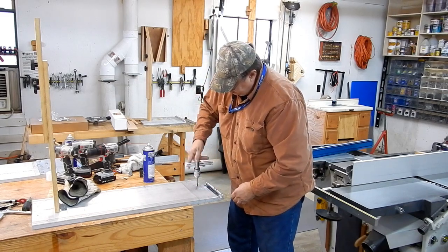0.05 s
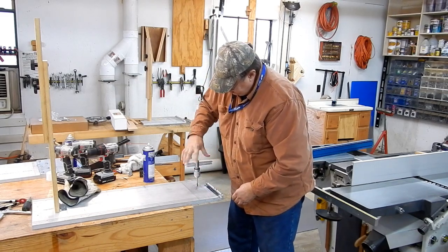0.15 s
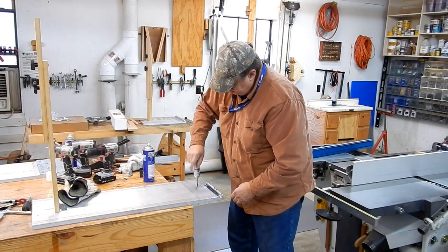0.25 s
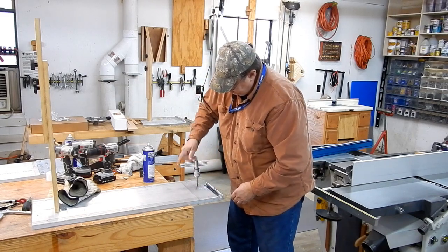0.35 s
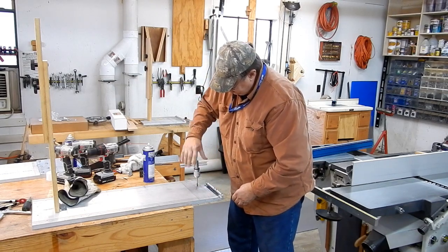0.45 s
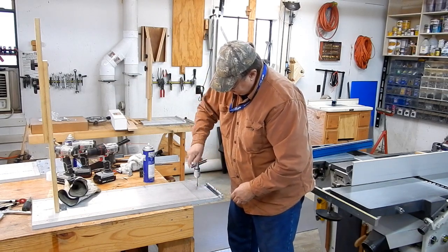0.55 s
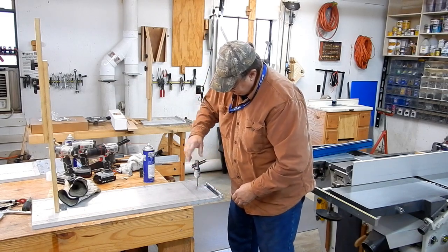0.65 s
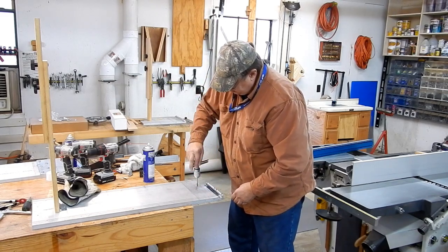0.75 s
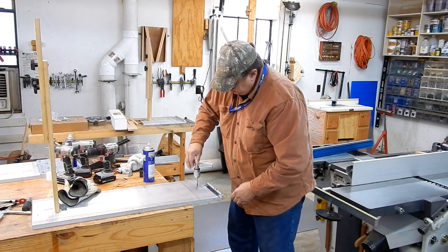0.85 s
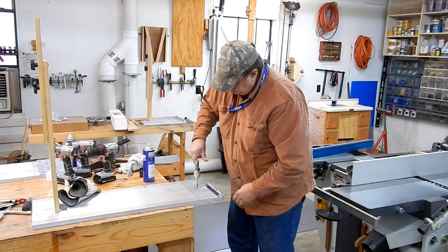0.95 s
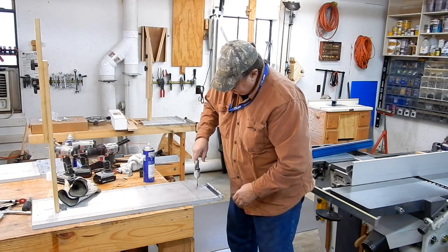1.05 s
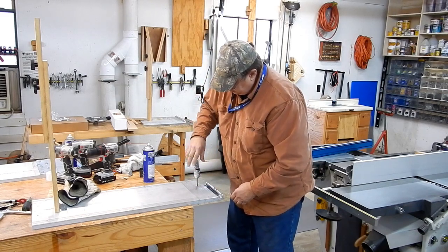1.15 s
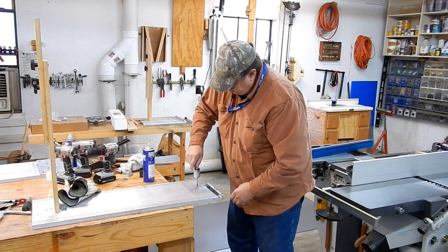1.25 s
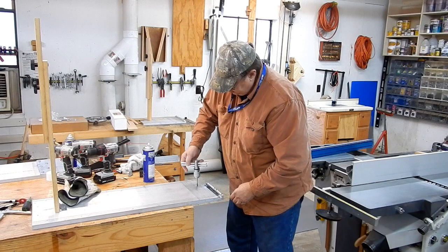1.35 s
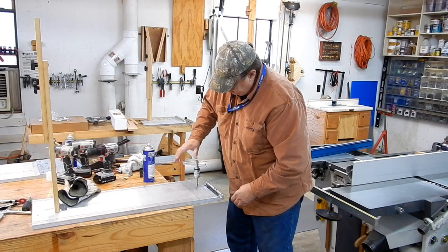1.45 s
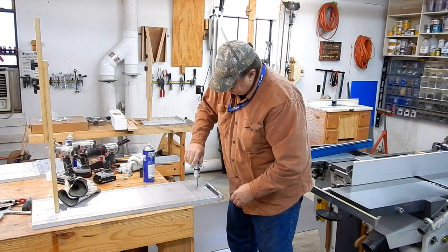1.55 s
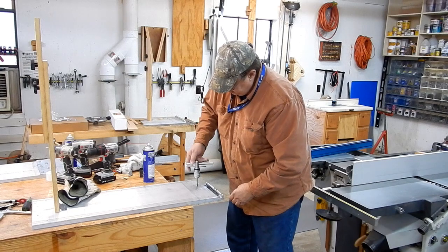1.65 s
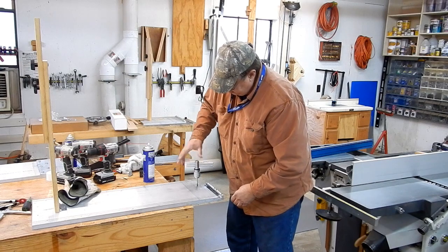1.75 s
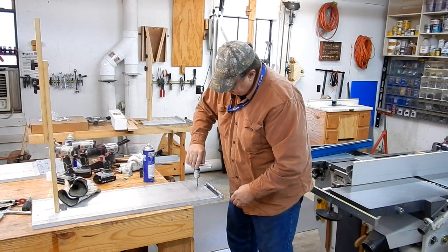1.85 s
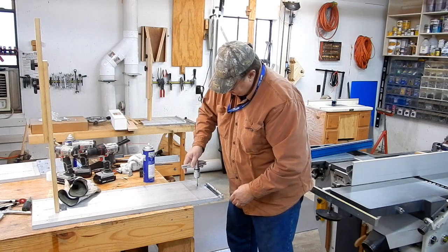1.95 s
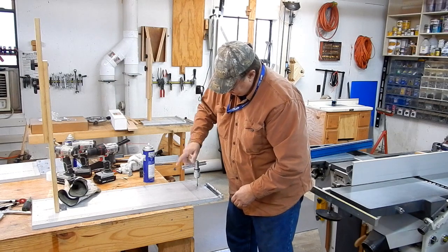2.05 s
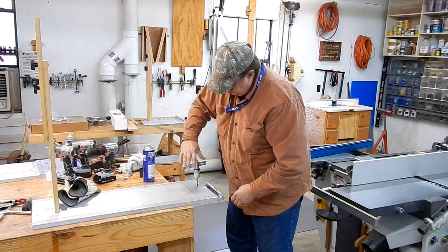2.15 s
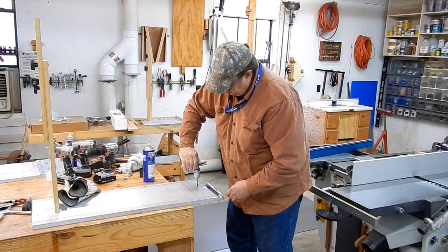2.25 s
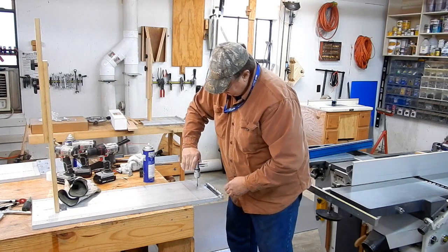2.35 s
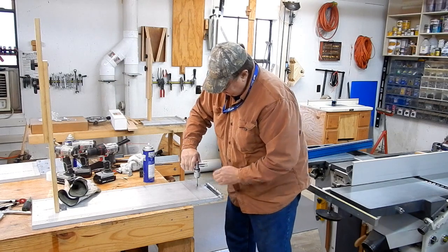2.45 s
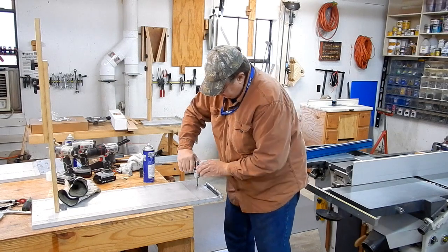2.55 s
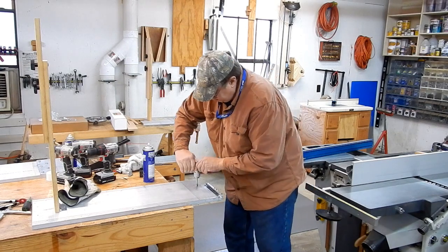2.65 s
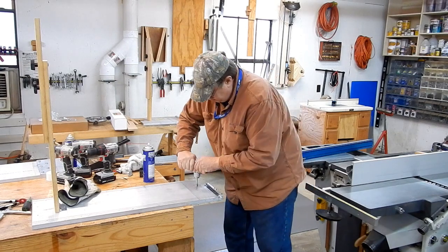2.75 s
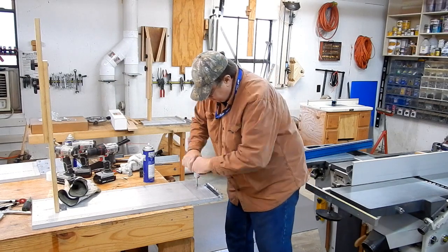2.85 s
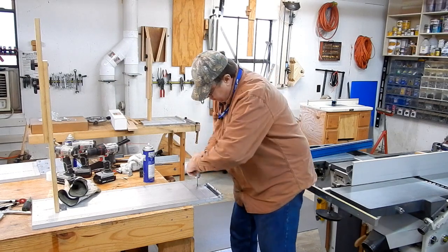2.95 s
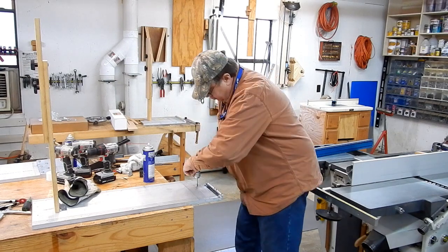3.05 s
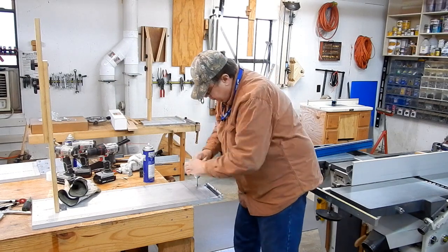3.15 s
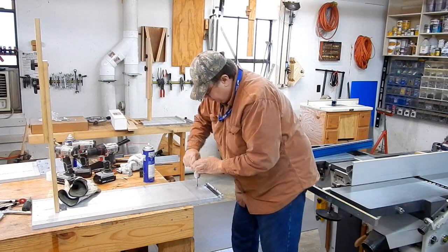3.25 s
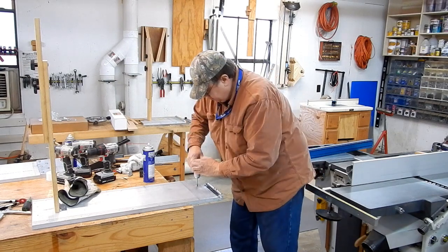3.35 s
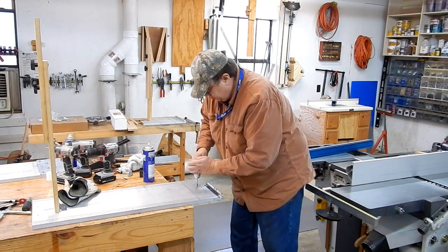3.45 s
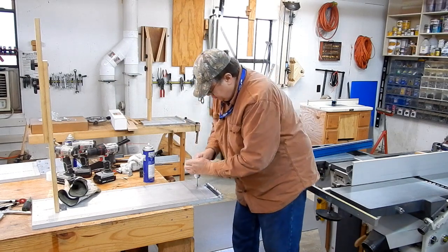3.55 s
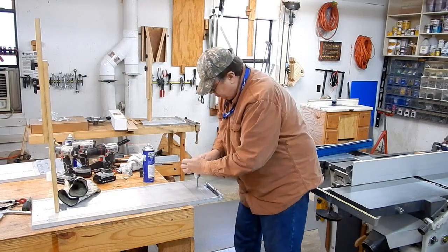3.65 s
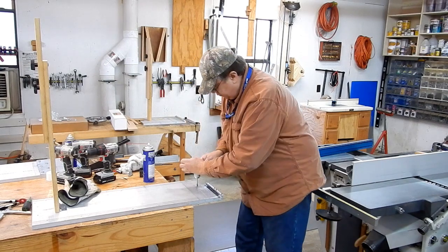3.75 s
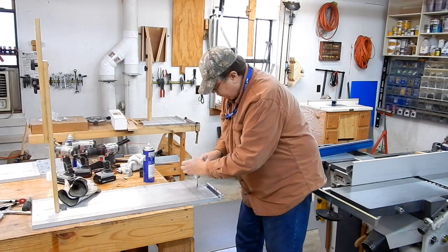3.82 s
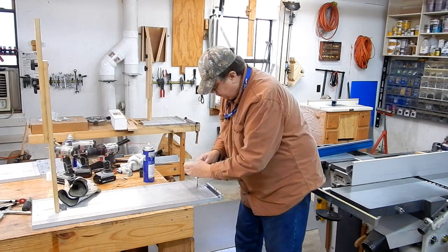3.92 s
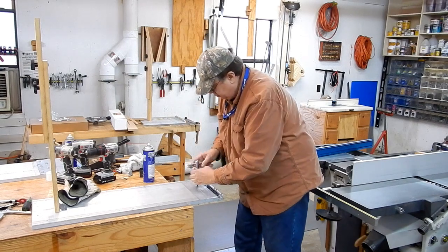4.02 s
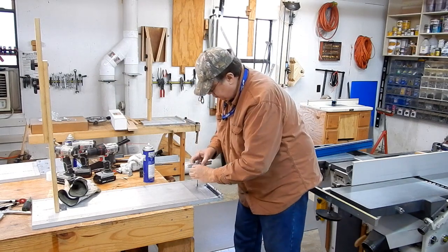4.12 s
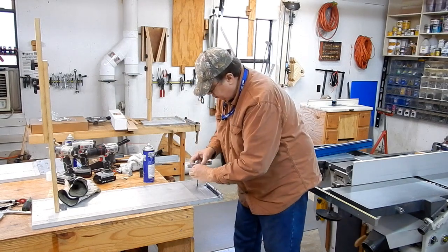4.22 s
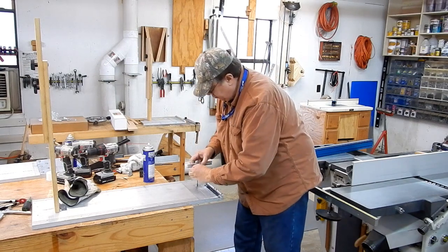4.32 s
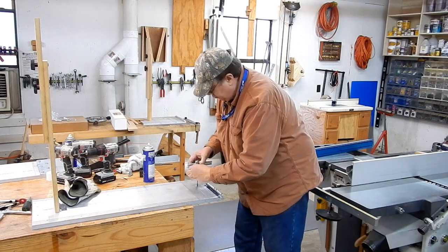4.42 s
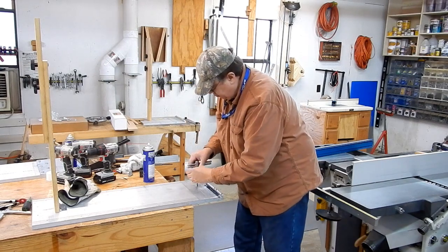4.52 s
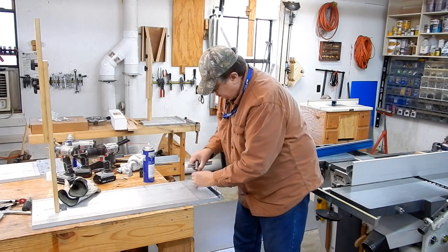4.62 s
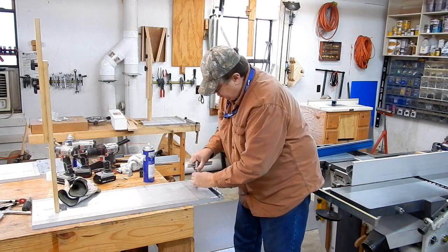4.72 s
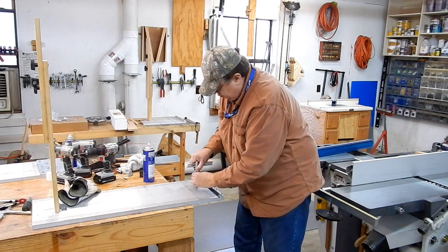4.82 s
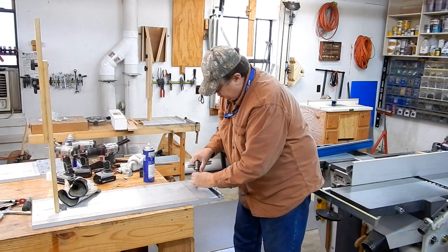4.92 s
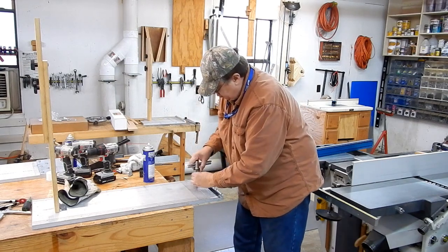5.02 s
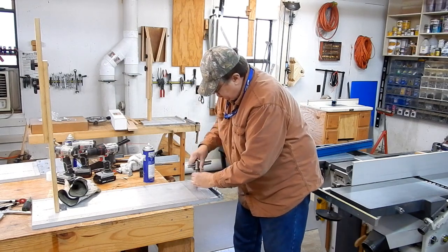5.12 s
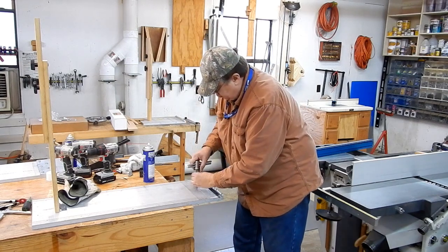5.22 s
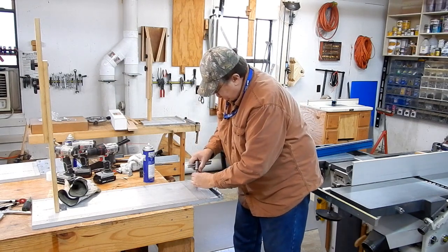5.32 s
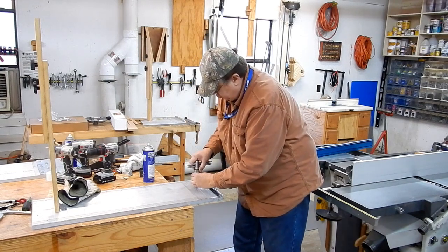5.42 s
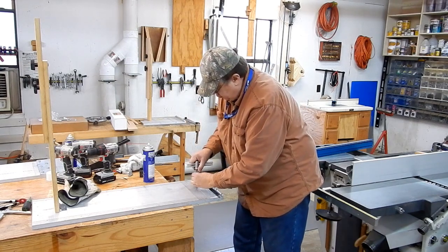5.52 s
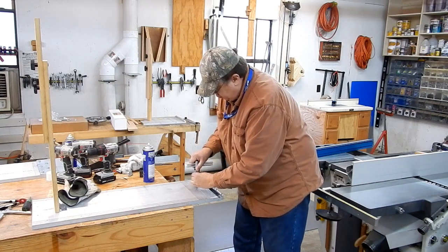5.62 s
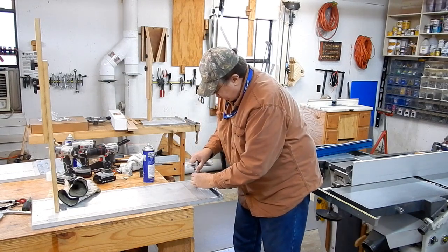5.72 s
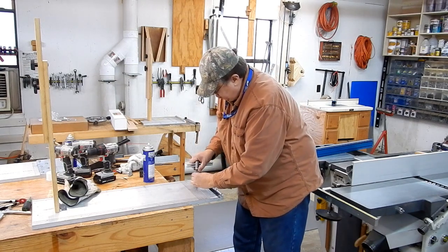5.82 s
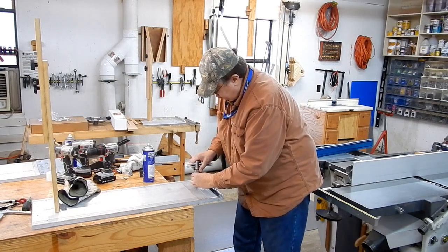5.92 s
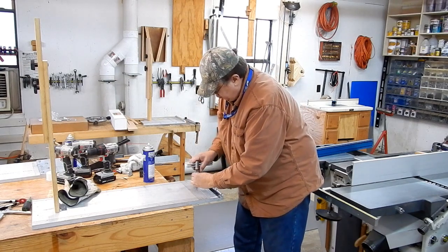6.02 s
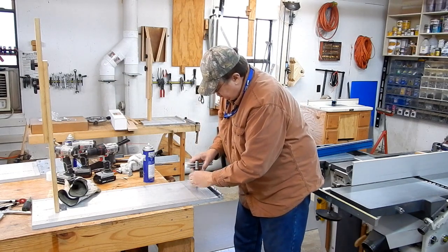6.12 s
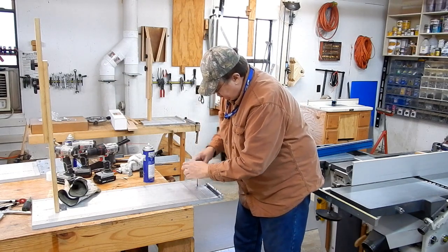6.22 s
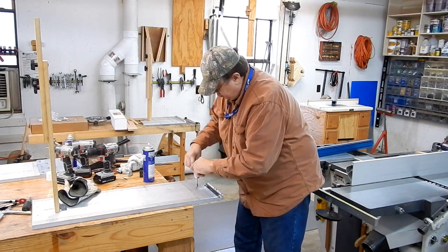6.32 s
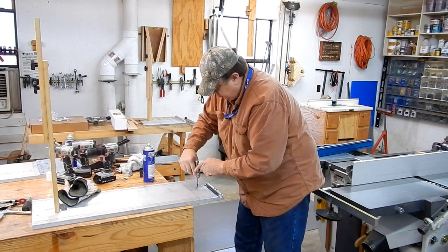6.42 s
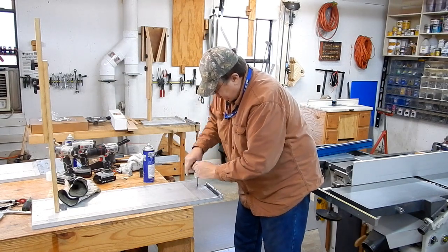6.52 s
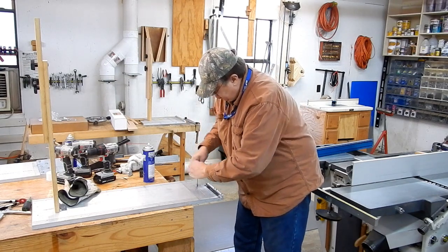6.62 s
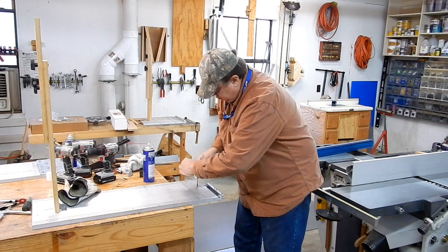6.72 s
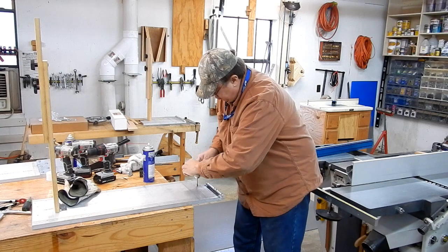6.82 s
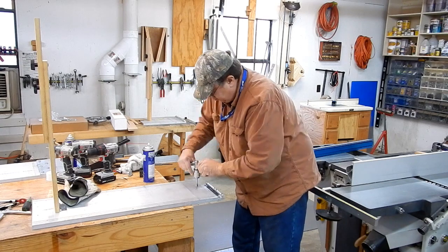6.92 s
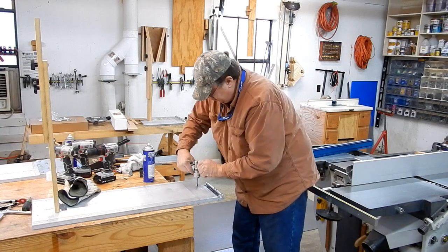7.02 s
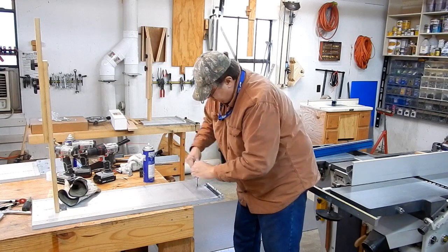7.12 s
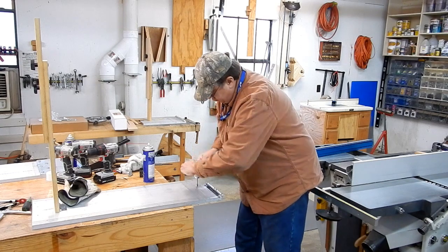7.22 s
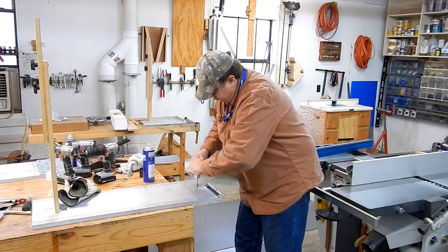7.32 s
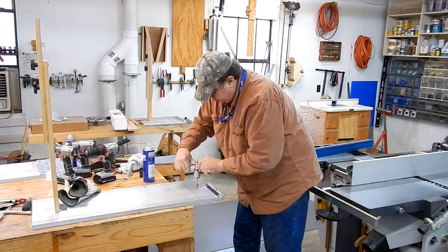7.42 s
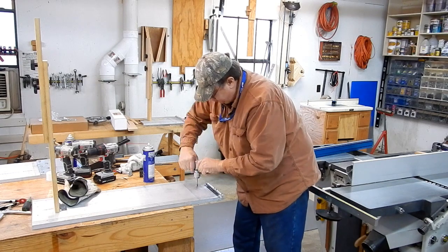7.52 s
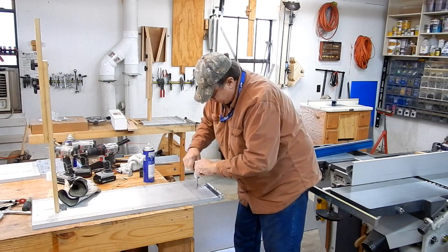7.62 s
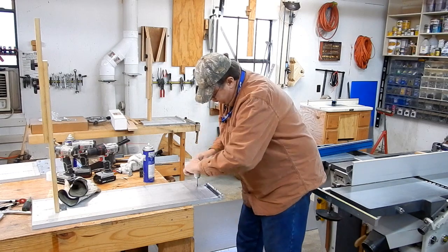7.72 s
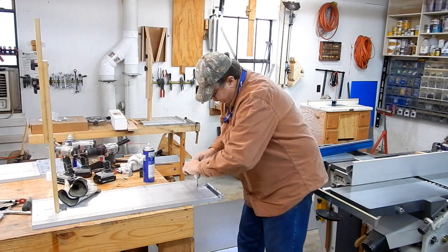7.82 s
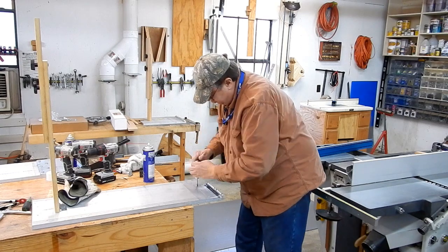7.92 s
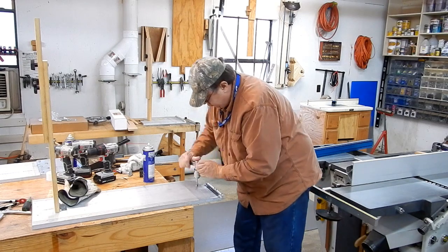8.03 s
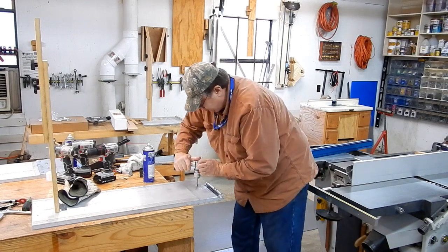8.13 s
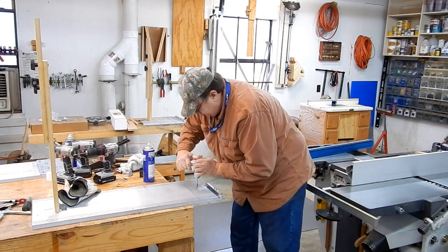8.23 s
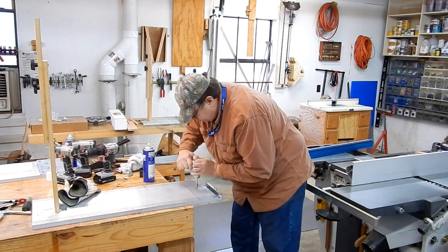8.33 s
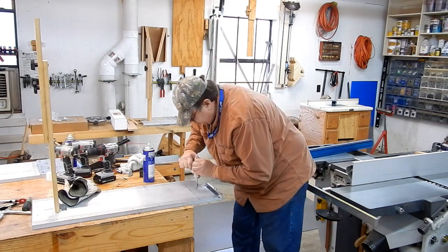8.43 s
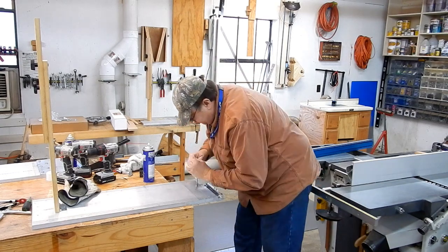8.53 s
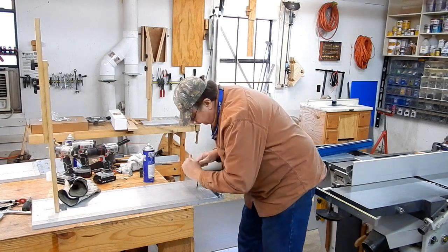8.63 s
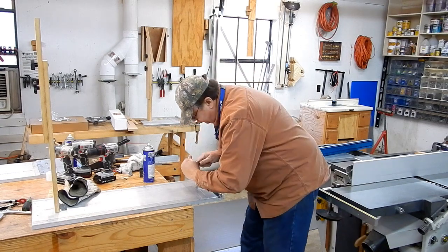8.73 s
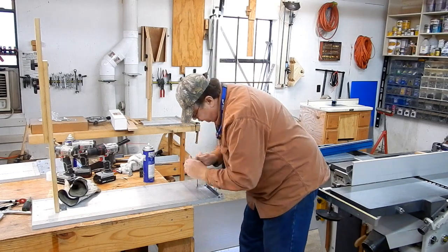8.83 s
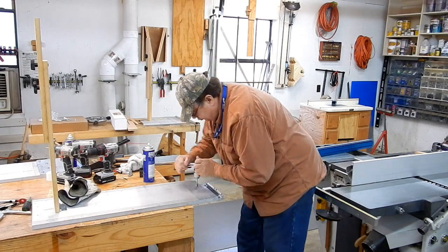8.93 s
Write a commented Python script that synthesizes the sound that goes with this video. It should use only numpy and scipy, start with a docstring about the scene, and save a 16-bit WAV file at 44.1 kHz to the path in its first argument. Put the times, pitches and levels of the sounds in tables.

```python
"""On a workshop bench, a tap wrench is spun and then forced round by hand in an aluminium plate.
The loose handle clacks and the tap slips in jerks: rough noise contacts, in eight bands, ring plate and room.
Low chatter tones, faint rubbing noise and a distant motor's wavering hum lie over a quiet hiss.
A two-port microphone hears it, with a narrow notch and a treble limit."""
import sys
import numpy as np
from scipy import signal
from scipy.fft import rfft, irfft
from scipy.io import wavfile
from scipy.ndimage import uniform_filter1d

SR = 44100
rng = np.random.default_rng(int(sys.argv[2]) if len(sys.argv) > 2 else 0)


def transcribe(signal):
    """Save signal, clipped to [-1, 1], as a 16-bit WAV file at the path in sys.argv[1]."""
    frames = np.atleast_2d(signal).T
    limited = np.clip(frames, -1, 1)
    pcm = np.round(limited * 32767).astype(np.int16)
    wavfile.write(sys.argv[1], SR, pcm)


N = 395577


def gain_of(db):
    """Amplitude factor of a level in dB."""
    return 10 ** (np.asarray(db) / 20)


def evened(x):
    """Scale a signal to an rms of one."""
    return x / np.sqrt(np.mean(x ** 2) + 1e-20)


def read(points, hz):
    """Read a curve of (frequency, value) points along a log frequency axis."""
    f, value = np.transpose(points)
    return np.interp(np.log(hz + 1), np.log(f + 1), value)


def add(mix, start_s, sound):
    """Add a sound to the mix at a start time, cut at the end of the mix."""
    part = mix[..., round(start_s * SR):][..., :sound.shape[-1]]
    part += sound[..., :part.shape[-1]]


def coloured(points):
    """Noise at an rms of one, shaped by a spectrum curve."""
    gain = gain_of(read(points, np.fft.rfftfreq(N, 1 / SR)))
    return evened(irfft(rfft(rng.standard_normal(N)) * gain, N))


def arch(length_s, sharp, early):
    """A swell that rises and falls once, peaking sooner for a small early."""
    progress = np.arange(0, length_s, 1 / SR) / length_s
    return np.sin(np.pi * progress ** early) ** sharp


def bench():
    """Each band of force rings the matching band of the plate."""
    # how strongly each of the eight bands of a blow sounds: level_db
    band_levels = [26.43, 20.2, 27.37, 23.7, 18.1, 25.74, 26.83, 9.1]
    ring, out = plate(), np.zeros(N)
    for k, force in enumerate(drive()):
        part = band(ring, k)
        part /= np.linalg.norm(part)
        out += gain_of(band_levels[k]) * signal.oaconvolve(force, part)[:N]
    return out


def drive():
    """Forces on the plate in eight bands: each blow is a sharp click and a short rough contact."""
    # the loose handle clacks: start_s, strength_db, brightness_db, weight on the bench_db,
    # lean_db from clack to plate body
    clacks = [(0.001, -40, -13, 4.5, 0), (0.019, -33.5, -13, -10.5, 9), (0.076, -31.5, -8.5, 1, 4.5),
              (0.2057, -40, -17.5, -3, -8), (0.218, -38, -25, -1.5, 1), (0.2732, -45.5, -5, 6.5, 10),
              (0.3192, -34, -14.5, -8, -1), (0.4792, -36.5, -12, -8.5, 6), (0.487, -34.5, -14.5, -9, 3),
              (0.531, -42.5, -21, 3, -3.5), (0.5821, -41.5, -24, -3.5, 0), (0.75, -41, -20, -3.5, 0),
              (0.765, -40, -30, -3, -2), (0.8164, -46.5, -29, -4, -7), (0.851, -47, -16, -24, 12),
              (0.891, -46.5, -16, -9, 0), (0.9497, -51, -39, -5, -5), (1.269, -43, -14, 2, 8),
              (1.301, -33.5, 0, -3, 11), (1.533, -39.5, -14, -0.5, 5), (1.6119, -38.5, -18.5, -4.5, 11),
              (1.6733, -48.5, -16, 3, 8), (1.6963, -36.5, -29, -9.5, 14), (1.8246, -44, -24, -5, 7),
              (1.8315, -44, -12, 4.5, 4), (1.8896, -50, -10, -17, 6), (2.0328, -36, -12.5, -5, -4),
              (2.221, -36.5, -14.5, -11, 2), (2.231, -38, -17.5, -1, 3.5), (2.274, -69, -6, 5, 7),
              (3.142, -45, -11, 1, -3), (3.153, -45, -7, 0, -11), (3.1881, -64, -6, 9, -11),
              (3.2156, -49, -12, 2.5, -3), (3.2384, -40, -33, -15, 2.5), (3.2859, -50.5, -21, 3, -16),
              (3.2988, -45, -11, 2, -21), (3.3091, -38, -4.5, -29, -1), (3.3227, -28, -26, -14.5, -6),
              (3.7784, -54, -10, -4.5, -11), (3.8139, -43.5, -18, -22, -6), (3.834, -43, -12.5, -7, 4),
              (3.96, -38, -17, -11, -9), (4.082, -57, -22, 2, 12), (4.142, -54.5, -28, -4, 10),
              (4.2125, -41, -16, -6, -2.5), (4.2472, -46, -16, -14, -6), (4.6, -59.5, -21, -3, 5),
              (4.671, -59.5, -23, 2, -3), (4.7282, -48, 6, -27, -1), (4.76, -44.5, -5, -11, -2),
              (5.007, -55, -26, -6, 4), (5.4827, -51.5, -12, -6, -12), (5.4897, -47, 1.5, -11, 7),
              (5.773, -59, 2.5, -10, 1), (5.8004, -54, -18, -11, 3), (5.8082, -66.5, 14.5, 12.5, 6),
              (5.8622, -44.5, -1, -18, -10), (5.9, -59, -14, -7, -4), (5.935, -42, -10, -13, -12),
              (6.13, -58, -22, -1, 0), (6.4822, -33, -2.5, 0, -0.5), (6.9883, -41.5, 4.5, -3, 1),
              (7.1859, -61.5, 1, -5, -2), (7.3065, -51.5, -2, -1, -4), (7.504, -34, -15.5, -5.5, -4),
              (7.7821, -53.5, -15, 3.5, 2.5), (7.883, -58, -6, 2, 2), (7.9563, -57, 1, 0.5, -2),
              (8.201, -44, -19, 2, 9)]
    # the tap slips in jerks during five forced turns: start_s, strength_db, brightness_db,
    # lean_db from clack to plate body
    slips = [(6.2131, -35.5, -2, 11), (6.2289, -36.5, 0.5, -17), (6.2438, -33, -0.5, 7),
             (6.2614, -33.5, 2, -12), (6.2724, -35, 3, 12), (6.2857, -31, -8, 23), (6.2974, -36, -3, 25),
             (6.3068, -33, 1, -18), (6.3341, -29, -4, -19), (6.359, -38, 4.5, 13), (6.3924, -37, 8, 20),
             (6.8293, -41.5, -8, 5), (6.8466, -31, -1, -15), (6.8638, -35.5, 8, -6), (6.8793, -32, 4, -4.5),
             (6.8954, -35, 10, -3), (6.9112, -31.5, 4.5, -3.5), (6.926, -37, 5.5, -20),
             (6.9511, -34, 2.5, -22), (7.3409, -32.5, -3, -3), (7.3608, -32, 2, -1), (7.3753, -33, 2, 10),
             (7.388, -29.5, -4, -11), (7.4016, -35.5, 7.5, 7), (7.4164, -46.5, 19.5, 3),
             (7.4383, -36.5, 6, 9), (7.9734, -33.5, -2.5, -8.5), (7.9998, -33.5, 4, -9.5),
             (8.023, -35.5, 4.5, -6), (8.0484, -36.5, 4, 13), (8.0781, -49.5, 15, -14), (8.1201, -42, 8, 0),
             (8.8454, -33.5, -3.5, -10.5), (8.868, -33, 2, -1), (8.8841, -31, 4.5, -8),
             (8.9026, -36.5, 4, -2), (8.9175, -37, 6.5, -1), (8.94, -34, 4, -0.5),
             (8.9626, -28.5, -3.5, -10)]
    slip_weight_db = -17  # a slip hardly reaches the bench
    clack_contact_s, slip_contact_s = 0.0018, 0.002
    rattle_per_s, rattle_db, rattle_s = 200, 6, 0.007  # small ticks that follow each contact

    blows = [(*row, clack_contact_s) for row in clacks]
    blows += [(*row[:3], slip_weight_db, row[3], slip_contact_s) for row in slips]
    force = np.zeros((8, N))
    grain = rng.standard_normal((len(blows), 1500))
    ticks = rng.random(grain.shape) < rattle_per_s / SR
    grain[:, 0] = 6.4 * np.sign(grain[:, 0])  # the sharp click
    t = np.arange(grain.shape[1]) / SR
    for (start_s, strength, tick, thud, lean, contact_s), g, tick_at in zip(blows, grain, ticks):
        rattle = gain_of(rattle_db) * tick_at * np.exp(-t / rattle_s)
        contact = g * (np.exp(-t / contact_s) + rattle)
        # a lean either way takes level from the other side
        body, clack = min(lean, 0), min(-lean, 0)
        # blows that reach the bench or lean low fill the lower plate
        low_body = body + 0.5 * (thud - body) + 0.48 * lean
        # bright blows carry the clack higher and reach further up
        high_clack = clack + 0.73 * (tick - clack)
        air = tick + 0.24 * (tick - body)
        # the upper ring follows brightness in part
        upper = -8.5 + 0.33 * tick + 0.059 * lean
        band_db = strength + np.array([thud, low_body, body, clack, high_clack, upper, tick, air])
        add(force, start_s, np.outer(gain_of(band_db), contact / np.linalg.norm(contact)))
    return force


def plate():
    """Ring of plate, wrench and bench after one blow: a causal broad colour plus decaying strong modes."""
    # strong modes: pitch_hz, width_hz (wider dies sooner), level_db before a common lift
    modes = [(431, 22, -4), (468, 23, -3), (603, 24, -5), (665, 24, -8), (1281, 28, -8), (1523, 30, -7),
             (1658, 31, -6), (1798, 31, -4), (1890, 32, -3), (1981, 33, 1), (2045, 33, -2), (2118, 34, -5),
             (2374, 35, -4), (2471, 36, -4), (2611, 37, -6), (2697, 37, -6), (2853, 39, -9), (3063, 40, -7),
             (3165, 41, -8), (3252, 41, -6), (3747, 44, -8), (3892, 45, -8), (4802, 52, -10),
             (4915, 52, -10), (5179, 54, -12), (5550, 57, -13), (6620, 64, -16), (8650, 77, -10),
             (9357, 82, -4), (9650, 84, 0)]
    # broad colour of the ring under the strong modes: frequency_hz, level_db
    broad_colour = [(150, -18.5), (300, -17), (700, -3.5), (950, -23.5), (1270, 2.5), (1450, -13.5),
                    (2000, -3), (3300, -14), (5000, -16.5), (7200, -19.5), (9500, -1), (11000, -17),
                    (12300, -33.5), (13800, -23), (15500, -65)]
    lift_db = 3.5
    log_gain = np.log(gain_of(read(broad_colour, abs(np.fft.fftfreq(8192, 1 / SR)))))
    # minimum phase: the colour starts at once and never before the blow
    ring = np.fft.ifft(np.exp(np.conj(signal.hilbert(log_gain)))).real
    t = np.arange(len(ring)) / SR
    for hz, width, db in modes:
        strength = gain_of(db + lift_db) * 2 * np.pi * width / SR
        ring = ring + strength * np.exp(-np.pi * width * t) * np.sin(2 * np.pi * hz * t)
    return ring


def band(x, k):
    """Bandpass one of the eight bands of a blow."""
    # edges of neighbouring bands: edge_hz
    edges = [200, 900, 1600, 2250, 3300, 4400, 7000, 11500, 16500]
    return signal.sosfilt(signal.butter(4, edges[k:k + 2], "band", fs=SR, output="sos"), x)


def chatter():
    """The tap chatters on a low plate mode: steady sine tones in swells whose bite is uneven."""
    # tones: start_s, length_s, pitch_hz, level_db (rms at full swell, before the uneven bite)
    tones = [(4.223, 0.083, 434, -57), (6.37, 0.074, 438, -59.5), (7.323, 0.15, 467, -43.5),
             (7.512, .08, 427.7, -51.5), (8.813, 0.05, 442, -54)]
    out = np.zeros(N)
    shake_db = 2.5 * evened(uniform_filter1d(rng.standard_normal(N), 500))
    for start_s, length_s, hz, db in tones:
        swell = arch(length_s, sharp=0.6, early=0.77)
        tone = np.sin(2 * np.pi * hz * np.arange(len(swell)) / SR)
        add(out, start_s, np.sqrt(2) * gain_of(db) * tone * swell)
    return out * gain_of(shake_db)


def room(x, direct_db, direct_hz=4000, early_t60=0.028):
    """Three decaying noise tails take turns; two versions have unrelated tails, which the ports later blend."""
    # late decay: frequency_hz, t60_s
    late_decay = [(200, 0.47), (530, 0.41), (1400, 0.28), (3700, 0.28), (6500, 0.2), (9700, 0.2),
                  (14000, 0.24)]
    # first echoes off the bench against the late tail: frequency_hz, level_db before doubling
    early_levels = [(300, -1.5), (2000, 8), (5500, -2), (9500, 5), (14000, 4)]
    # build-up, quickest in the treble: frequency_hz, time_constant_s before the curve is bent
    rise = [(300, 0.0087), (1500, 0.0086), (3500, 0.0023), (9000, 0.0012)]
    turns_per_s = 3.7  # the echo keeps changing

    hz, t, z = signal.stft(rng.standard_normal((2, 3, SR // 2)), SR, nperseg=128)
    late = gain_of(-60 * t / read(late_decay, hz)[:, None])
    early = 2 * gain_of(read(early_levels, hz)[:, None] - 60 * t / early_t60)
    build = 1 - np.exp(-t / read(rise, hz)[:, None])  # echoes and plate waves build up after the blow
    z = z * np.hypot(late, early) * build ** 0.74
    z /= np.linalg.norm(z, axis=-1, keepdims=True)  # the room favours no band
    tails = signal.istft(z, SR, nperseg=128)[1]
    tails /= np.linalg.norm(tails, axis=2, keepdims=True)
    # small tools radiate treble straight, into the first version only
    direct = signal.lfilter(*signal.butter(1, direct_hz, "high", fs=SR), np.arange(64) == 0)
    tails[0, :, :64] += gain_of(direct_db) * direct
    turn = 2 * np.pi * (np.arange(N) / SR * turns_per_s + np.arange(3)[:, None] / 3)
    shares = x * np.sqrt(2 / 3) * np.cos(turn)
    return signal.oaconvolve(shares, tails, axes=2)[..., :N].sum(1)


def ports(a, b, same, lean, lead):
    """Two ports: the right one hears a share of the left one's sound and a share of a second sound."""
    hz = np.fft.rfftfreq(N, 1 / SR)
    share = np.clip(read(same, hz), 0, 1)
    tilt = gain_of(read(lean, hz) / 2)
    shared = share * rfft(a) * np.exp(-1j * read(lead, hz))
    second = np.sqrt(1 - share ** 2) * rfft(b)
    return irfft([rfft(a) * tilt, (shared + second) / tilt], N)


def rubbing():
    """Soft rubbing of hands and sleeves: faint grainy noise in short swells, two versions the ports blend."""
    # rubs: start_s, length_s, level_db (rms at full swell, before the grain)
    rubs = [(2.46, 0.69, -64.5), (3.411, 0.14, -48), (5.783, .26, -78), (7.093, .22, -69), (8.3, 0.71, -72)]
    # colour of skin and cloth: frequency_hz, relative_level_db per Hz
    spectrum = [(470, -54), (800, -12), (1620, -51), (2000, 0.5), (2600, -52), (3330, -7.5), (7010, -17),
                (9210, -2), (15500, -36)]
    level = np.zeros(N)
    for start_s, length_s, db in rubs:
        add(level, start_s, gain_of(db) * arch(length_s, sharp=2.2, early=0.6))
    grain = gain_of(1.2 * evened(uniform_filter1d(rng.standard_normal(N), 150)))
    return [level * grain * coloured(spectrum) for _ in range(2)]


def hum():
    """A distant motor hums: sine lines on multiples of one wavering pitch, slowly fading up and down."""
    # lines: multiple of the base pitch, level_db (rms before fading)
    lines = [(2, -66.5), (3, -66.5), (4, -69.5)]
    # slow fading: time_s, gain_db
    fade = [(0, -7), (2.5, -5), (4, -8.5), (6, -12.5), (8.97, -6)]
    base_hz, waver_depth = 80.7, 0.00866
    t = np.arange(N) / SR
    waver = evened(uniform_filter1d(uniform_filter1d(rng.standard_normal(N), 6000), 6000))
    turns = np.cumsum(base_hz * (1 + waver_depth * waver)) / SR
    tone = sum(gain_of(db) * np.sin(2 * np.pi * k * turns) for k, db in lines)
    return np.sqrt(2) * tone * gain_of(np.interp(t, *np.transpose(fade)))


def hiss():
    """Air and microphone noise: coloured noise that swells a little, partly alike in the two ports."""
    # colour: frequency_hz, relative_level_db per Hz
    spectrum = [(15, -15), (25, -19), (43, -2.5), (156, 0.5), (435, -3.5), (540, -4), (1000, -11),
                (1670, -8), (2570, -13), (3280, -11.5), (4410, -16.5), (7570, -28), (9390, -12),
                (11000, -28), (15700, -35)]
    # likeness of the ports: frequency_hz, share (0-1)
    same_hiss = [(60, 0.7), (180, 0.11), (550, 0.21), (1650, 0.5), (4970, 0.2), (15000, 0.077)]
    # balance: frequency_hz, left_minus_right_db
    lean_hiss = [(60, 3), (180, -1.5), (550, 0.5), (1650, -1.5), (4970, 2), (15000, 0.5)]
    lead_hiss = [(1, 0), (2, 0.011)]  # frequency_hz, left_lead_radians
    level_db, swell_db = -59.5, 1.54
    slow = evened(uniform_filter1d(uniform_filter1d(rng.standard_normal(N), 4000), 4000))
    swell = gain_of(swell_db * slow)
    noise = ports(coloured(spectrum), coloured(spectrum), same_hiss, lean_hiss, lead_hiss)
    return gain_of(level_db) * swell * noise


def scene():
    """Blows and chatter ring in the room; rubbing and dry chatter join at the ports, over hiss and hum."""
    # likeness of the ports for the bench sounds: frequency_hz, share (0-1)
    same = [(60, .45), (150, 0.9), (300, 0.86), (640, 1), (1500, 1), (5000, 1), (5600, 0.77), (9500, 0.67),
            (11000, 1), (12500, 0), (15000, 0.4)]
    # balance of the ports: frequency_hz, left_minus_right_db
    lean = [(100, 8), (400, 2.5), (1500, 1.9), (4000, 0.5), (6500, -0.5), (8300, 0), (9600, 4.5),
            (12000, 6), (15000, 5.5)]
    # phase lead of the left port: frequency_hz, left_lead_radians
    lead = [(6000, 0.29), (8000, 0), (9300, 1), (11000, 1), (13000, 0)]
    groan = chatter()
    struck = bench() + gain_of(-6) * groan
    near = room(struck[None, None], direct_db=-5) + rubbing() + groan
    return ports(*near, same, lean, lead) + hiss() + hum()


def record(dry):
    """The microphone housing cancels a narrow band; then a steep lowpass limits the treble."""
    notch_hz, notch_q, edge_hz = 4385, 7.0, 15750
    notched = signal.lfilter(*signal.iirnotch(notch_hz, notch_q, SR), dry)
    lowpass = signal.firwin(1023, edge_hz, window=("kaiser", 9), fs=SR)
    return signal.oaconvolve(notched, lowpass[None], "same")


dry = scene()
out = record(dry)
transcribe(out)
```